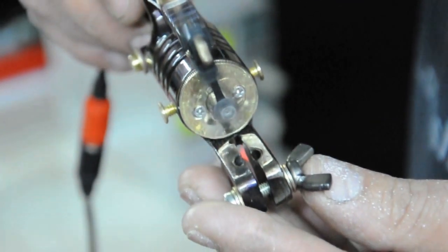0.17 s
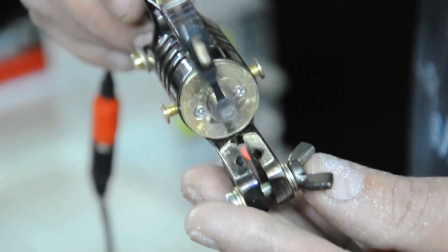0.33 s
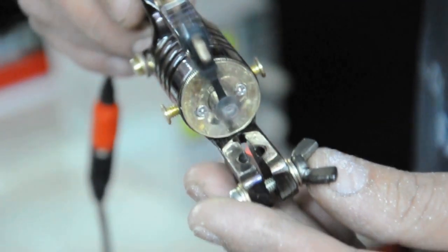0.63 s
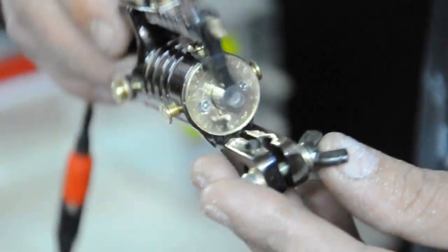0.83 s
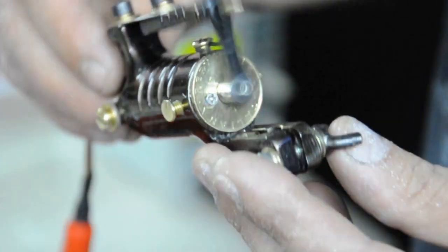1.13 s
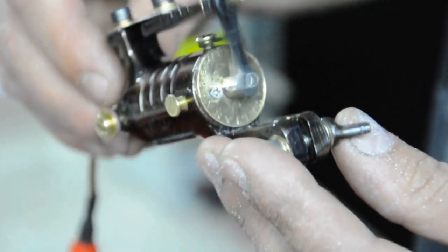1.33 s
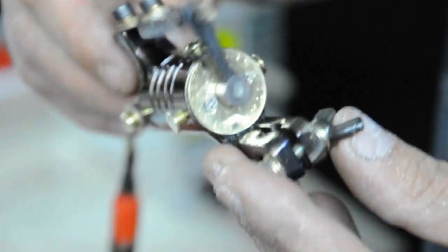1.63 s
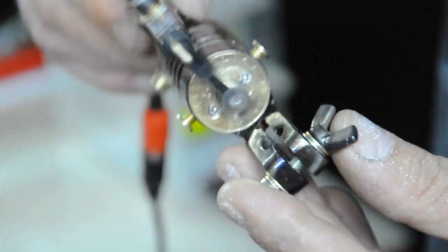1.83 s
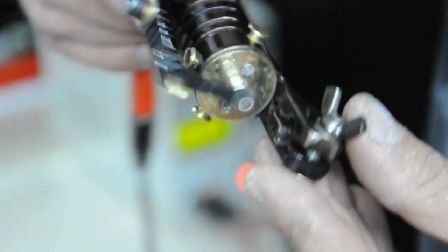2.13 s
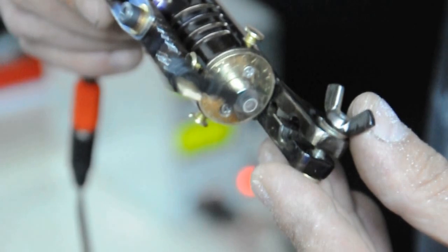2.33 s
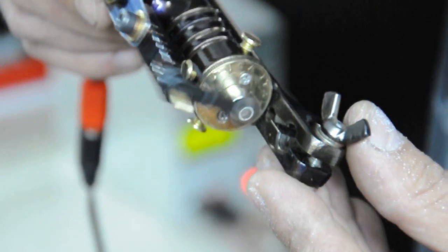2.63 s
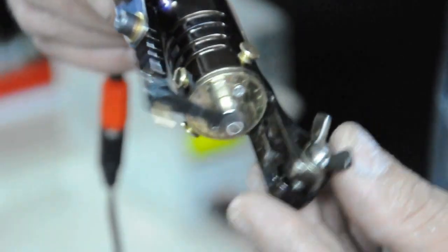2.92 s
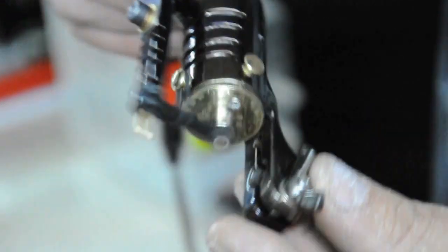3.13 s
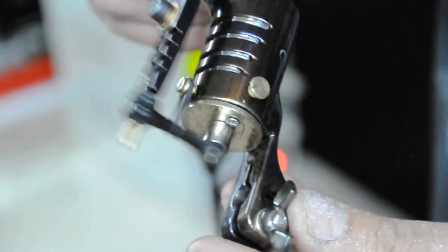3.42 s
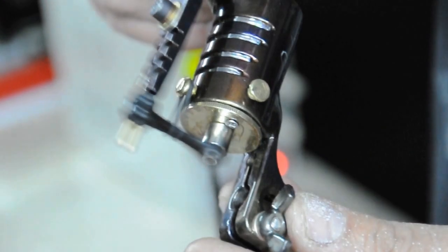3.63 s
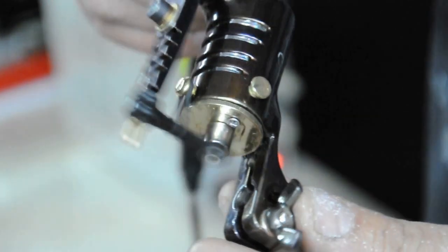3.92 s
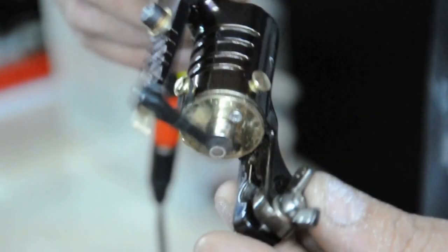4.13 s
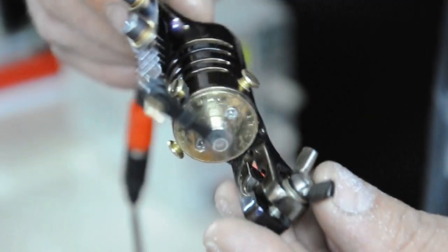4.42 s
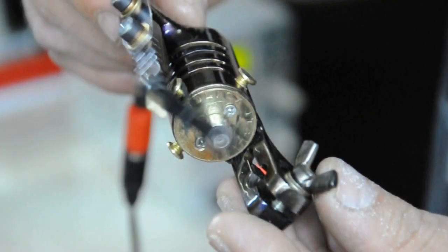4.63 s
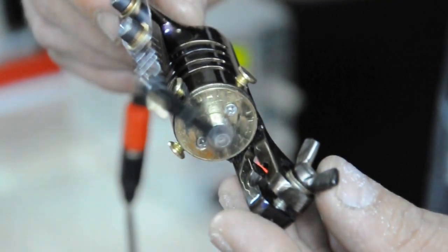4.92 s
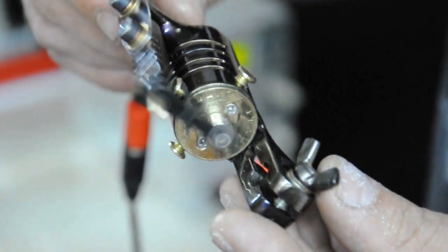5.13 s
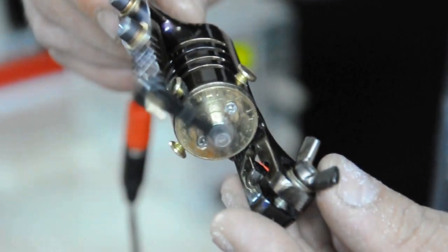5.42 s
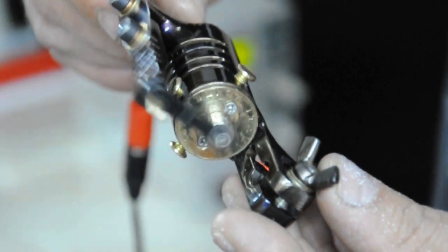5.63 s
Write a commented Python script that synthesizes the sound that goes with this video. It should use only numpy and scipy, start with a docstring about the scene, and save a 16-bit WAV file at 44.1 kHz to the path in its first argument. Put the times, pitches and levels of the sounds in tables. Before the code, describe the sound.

A small electric tattoo machine is already running close to the microphone and keeps going for the whole six seconds or so. Its needle bar knocks so fast that it makes a continuous, thin metallic buzz, mixed with a dry hiss of friction and a slight flutter about seven times a second. The speed is almost constant. From about 0.8 to 2 seconds, as the machine is turned, the pitch sags very slightly and high ringing tones briefly stand out. From around 2 seconds a faint, quick pinging from a loose part pulses within the buzz. Between 3 and 4 seconds the pinging is a little clearer and the highest hiss is slightly duller. From about 4.3 seconds the buzz brightens again and holds steady to the end. Throughout, room ventilation adds a soft, low rush and wavering hum in the background.

```python
"""Tattoo machine, turned in the hands

A rotary tattoo machine runs close to one microphone while it is turned over in the hands. Its crank
knocks the needle bar at both ends of each stroke and rings the metal parts, each beaming its own way;
the bearings and the sliding bar hiss in step. Farther back, the room's ventilation drones."""
import sys
import numpy as np
from scipy import signal
from scipy.fft import rfft, irfft
from scipy.io import wavfile

SR = 44100
rng = np.random.default_rng(int(sys.argv[2]) if len(sys.argv) > 2 else 0)


def to_wav(sig):
    """Store sig (one row per channel, or 1-D mono) as 16-bit WAV at the path in sys.argv[1].

    Samples outside -1..1 are clipped; the rate is SR.
    """
    pcm = np.clip(np.atleast_2d(sig), -1, 1) * 32767
    pcm = np.round(pcm).astype(np.int16)
    wavfile.write(sys.argv[1], SR, pcm.T)  # frames by channels


N = 254060
T = np.arange(N) / SR
SURGE_HZ, SURGE_PEAK_S, TURNS_PER_SURGE = 7.267, .078, 20

# How far the machine is swung from facing the microphone. Each row: time in seconds, angle in degrees.
SWING = [(0, 5), (.72, 6), (.85, -12), (.97, -15.5), (1.15, -21), (1.27, -60), (1.48, -56), (1.67, -31),
         (1.84, -29), (2, -3), (2.25, 15.5), (2.85, 19), (3.15, 56), (3.6, 61), (4, 53), (4.25, 36),
         (5.76, 31)]


def amp(db):
    """Decibels to gain."""
    return 10 ** (np.asarray(db) / 20)


def unit(x):
    """Scales to rms 1."""
    return x / np.sqrt(np.mean(x ** 2) + 1e-20)


def curve(rows):
    """Joins (seconds, value) rows by straight lines."""
    return np.interp(T, *np.transpose(rows))


def bumps(rows):
    """Sum of bell-shaped swells. Each row: centre in seconds, half length in seconds, height."""
    return sum(height * np.exp(-((T - centre) / length) ** 2) for centre, length, height in rows)


def colour(x, points):
    """Filters x by a spectrum of (Hz, dB) points and scales it to rms 1."""
    hz, db = np.transpose(points)
    gain = amp(np.interp(np.log(np.fft.rfftfreq(N, 1 / SR) + 1), np.log(hz), db))
    return unit(irfft(rfft(x) * gain, N))


def drift(rate):
    """A random wander of rms 1, with `rate` changes a second."""
    knots = rng.standard_normal(8192)
    return unit(np.interp(T * rate, np.arange(len(knots)), knots))


def resonate(x, hz, width_hz):
    """A resonance of gain 1 that follows the curve hz."""
    carrier = np.exp(2j * np.pi * np.cumsum(hz) / SR)
    pole = np.exp(-np.pi * width_hz / SR)
    envelope = signal.lfilter([(1 - pole) ** 2], [1, -2 * pole, pole * pole], x / carrier)
    return 2 * (carrier * envelope).real


def lobe(angle, facing, spread=14.7):
    """How far, 0-1, the microphone lies within a beam pointing at `facing`; all angles in degrees."""
    return np.exp(-((angle - facing) / spread) ** 2)


def from_moment(turns, moment):
    """Signed distance, in turns, to the nearest pass of the crank through `moment`."""
    return (turns - moment + .5) % 1 - .5


def ventilation(rush_db=-40.5, flicker_db=1.5, swell_waver_hz=4.9):
    """Behind the machine, a low rush of air with wavering hum tones and brief swells of its rumble."""
    # Spectrum of the moving air. Each row: frequency in Hz, relative level in dB.
    rush_spectrum = [(20, -30), (31, -23), (40, -10.5), (48, -12.5), (75, -19.5), (105, -13.5), (140, -9),
                     (175, -5), (215, -9), (260, -4), (300, -3.5), (345, -5), (385, -2.5), (470, -7),
                     (680, -13), (920, -10.5), (1400, -21), (4000, -67.5)]
    # Steady tones in the drone. Each row: pitch in Hz, level in dB, waver in Hz.
    hum_tones = [(56.8, -57, 0.52), (84.8, -63.5, 0.51), (114.9, -61, 0.76), (175, -52, 0.68),
                 (199.8, -54, 0.88), (243.4, -52.5, 0.4), (264.3, -51.5, 0.39), (302.7, -55.5, 0.94),
                 (368.4, -56.5, 3.04), (417.7, -52.5, 3.2)]
    # Brief random swells of the air's rumble, mostly near 380 Hz.
    # Each row: centre in seconds, half length in seconds, pitch in Hz, level in dB.
    rumble_swells = [(0.176, 0.032, 378, -45.5), (0.333, 0.033, 371, -44), (0.786, 0.036, 400, -40),
                     (.85, 0.042, 392, -41), (.94, 0.016, 377.5, -42), (1.075, 0.058, 382, -43),
                     (1.116, 0.026, 172, -40.5), (1.263, 0.067, 376.7, -42), (1.36, 0.028, 368, -38),
                     (1.47, .025, 385, -42.5), (2.073, 0.07, 275, -43.5), (2.166, 0.046, 380, -41),
                     (2.297, 0.061, 380, -45), (2.408, .02, 185, -42.5), (2.783, .035, 386, -41.5),
                     (2.96, .04, 369, -41.5), (3.12, 0.0083, 370.7, -34), (3.247, 0.014, 393.6, -38),
                     (3.346, 0.035, 396, -40.5), (3.76, 0.059, 368, -44.5), (3.984, 0.044, 379, -43.5),
                     (4.177, .04, 381, -41.5), (4.378, 0.031, 392, -40), (4.47, 0.012, 395, -40.5),
                     (4.648, 0.045, 375, -39.5), (4.768, 0.021, 259.4, -41), (4.985, 0.023, 381.5, -40.5),
                     (5.08, .035, 402, -42.5), (5.186, 0.016, 403.4, -41.5), (5.374, 0.034, 395.4, -38.5),
                     (5.499, 0.061, 370, -40), (5.59, .025, 403, -39.5)]
    drone = amp(rush_db) * colour(rng.standard_normal(N), rush_spectrum)
    for hz, db, waver_hz in hum_tones:
        cycles = np.cumsum(hz + waver_hz * drift(8)) / SR + rng.random()
        drone += np.sqrt(2) * amp(db + flicker_db * drift(5)) * np.sin(2 * np.pi * cycles)
    waver = np.cumsum(swell_waver_hz * drift(40)) / SR
    for centre, length, hz, db in rumble_swells:
        swell = bumps([(centre, length, amp(db))])
        drone += np.sqrt(2) * swell * np.sin(2 * np.pi * (hz * T + waver + rng.random()))
    return drone


def surging(moment=0):
    """The beat of the motor's surges, -1 to 1, peaking at `moment` (0-1) of each surge."""
    return np.cos(2 * np.pi * (SURGE_HZ * (T - SURGE_PEAK_S) - moment))


def crank(surge_depth_hz=1.0, sharpness=3.1, wander_hz=.059):
    """Turns made so far: the motor slows, snags, surges slightly seven times a second and wanders."""
    # Tipping the machine loads the bar and slows the crank. Each row: time in seconds, speed in Hz.
    speed = [(0, 145.5), (.68, 145.25), (.95, 144.2), (1.12, 143.9), (1.28, 142.6), (1.6, 143), (2.02, 145),
             (2.5, 145.35), (3.15, 144.7), (3.85, 144.95), (4.3, 145.5), (5.76, 145.6)]
    # Brief snags of the bar. Each row: centre in seconds, half length in seconds, speed lost in Hz.
    snags = [(.98, 0.03946, 0.774), (3.46, 0.056, .4), (4.0, .03, 1)]
    surge = np.exp(sharpness * (surging() - 1))
    hz = curve(speed) - bumps(snags) + surge_depth_hz * (surge - surge.mean()) + wander_hz * drift(40)
    return np.cumsum(hz) / SR


def knocks(turns, moment, slop_turns=.0011, contact_turns=.003, uneven_db=1.0):
    """One sharp knock a turn; play varies its timing and force, roughly repeating with every surge."""
    turn = np.round(turns - moment).astype(int) + 1
    pattern = rng.standard_normal((TURNS_PER_SURGE, 2))
    play = pattern[np.arange(1024) % TURNS_PER_SURGE] + .22 * rng.standard_normal((1024, 2))
    late, force = slop_turns * play[:, 0], amp(uneven_db * play[:, 1])
    offset = from_moment(turns, moment + late[turn])
    blow = np.exp(-.5 * np.minimum(abs(offset / contact_turns), 10) ** 2)
    return force[turn] * blow / (2 * contact_turns * np.sqrt(np.pi))


def sliding_hiss(turns, level_db=-43, side_on_db=-1, grit_db=1.5, worn_share=.3, grain_points=6080):
    """Friction of the bearings and the needle bar, flaring after each reversal of the bar."""
    # Spectrum of the friction. Each row: frequency in Hz, relative level in dB.
    hiss_spectrum = [(500, -26), (900, -8), (1300, -2.5), (1650, 0.5), (1900, 2), (2200, -2.5), (2800, 0.5),
                     (3300, -3), (3900, 0), (4600, 1.3), (5100, 0.5), (5500, -5), (6200, -10),
                     (6700, -25.5), (7200, -59.5)]
    # Where the parts scrape hardest. Each row: moment in the turn (0-1), width in turns,
    # added pressure in dB relative to the steady pressure.
    scrapes = [(0.052, 0.021, 5), (0.551, 0.048, 4)]
    pressure = 1 + sum(amp(db) * np.exp(-.5 * (from_moment(turns, moment) / width) ** 2)
                       for moment, width, db in scrapes)
    # Worn surfaces give part of the noise the same grain in every surge.
    position = turns / TURNS_PER_SURGE % 1 * grain_points
    grain = unit(np.interp(position, np.arange(grain_points), rng.standard_normal(grain_points)))
    friction = np.sqrt(worn_share) * grain + np.sqrt(1 - worn_share) * rng.standard_normal(N)
    hiss = colour(friction * pressure * amp(grit_db * drift(700)), hiss_spectrum)
    # The frame shades the hiss when side-on, and from one side also hides its treble.
    angle = curve(SWING)
    side_on = 1 - np.cos(np.radians(angle + 10))  # the bar faces the microphone at -10 degrees
    treble = signal.sosfiltfilt(signal.butter(6, 4900, "high", fs=SR, output="sos"), hiss)
    shade = amp(-4 * lobe(angle, facing=64, spread=22))
    return amp(level_db + side_on_db * side_on) * (hiss - treble + shade * treble)


def pings(turns, moment=.16, seated_hz=2593, drop_hz=190, drop_s=.013,
          attack_s=.014, hold_s=.039, release_s=.012, uneven_db=1.2):
    """Once a surge a loose part chatters for a few strokes; its ring drops in pitch as it seats again."""
    # Strength of the pings. Each row: time in seconds, gain in dB.
    strength = [(0, -61.5), (1.8, -50), (2.1, -49.5), (3.2, -46.5), (4, -47.5), (4.3, -49), (5.76, -49)]
    age_s = (SURGE_HZ * (T - SURGE_PEAK_S) - moment) % 1 / SURGE_HZ
    pitch = seated_hz + drop_hz * np.exp(-age_s / drop_s)
    ring = resonate(knocks(turns, 0), pitch, width_hz=120)
    burst = np.minimum(age_s / attack_s, 1) * np.exp(-np.maximum(age_s - hold_s, 0) / release_s)
    return ring * burst * amp(curve(strength) - uneven_db * drift(6))


def grip_shifts(pitches, edge_s=.018):
    """Extra dB over time for each metal mode: as the grip shifts, one part sings out or is damped."""
    # Each row: start and end in seconds, pitch in Hz (the nearest mode responds), gain in dB.
    spells = [(.79, .88, 2586, 5.5), (.81, 0.938, 2024, 2), (.95, 1.04, 2586, 9.5), (.95, 1.17, 4786, 7),
              (.97, 1.02, 2024, -6), (.97, 1.06, 2907, 7), (1.05, 1.154, 2024, 2.5), (1.06, 1.22, 2586, 5),
              (1.23, 1.28, 2586, -11), (1.54, 1.64, 4314, 6), (1.56, 1.737, 2586, 7.5),
              (1.62, 1.74, 2907, 8), (1.76, 1.836, 2024, 3.5), (1.77, 1.853, 2586, 6),
              (1.87, 1.97, 4786, 2), (1.9, 1.98, 2024, 0), (1.97, 2.117, 5234, 5.5),
              (3.15, 3.24, 2024, 0.5), (3.97, 4.074, 2024, 2.5)]
    extra_db = np.zeros((len(pitches), N))
    for start, end, hz, db in spells:
        gate = np.clip(.5 + np.minimum(T - start, end - T) / edge_s, 0, 1)
        extra_db[np.argmin(abs(pitches - hz))] += db * gate
    return extra_db


def ringing_metal(turns):
    """Close up, knocked parts ring, swelling or fading as their lobes and shadows pass the microphone."""
    # Modes of the metal parts. Each row: pitch in Hz, width in Hz, gain in dB, stroke that knocks it
    # (0 down, .5 up), angle in degrees and gain in dB of a first lobe or shadow, the same for a second,
    # depth in dB of its pulsing with the surges, moment of that pulse in each surge (0-1).
    modes = [ (1164, 100, -63.5, 0, 1.5, 4.5, 34.5, 8.5, 2.5, 0.5),
             (1313, 62, -54.5, 0, -40, -15.5, -7.5, -6.5, 1, 0.2),
             (1453.5, 120, -53, 0, -38.5, -4.5, -8, -2, 0.5, .9),
             (1602, 55, -50, 0, -24.5, -11, 34.5, 2, 1.5, .69),
             (1760, 66, -56, 0, 33.5, 9, 60.5, 9, 1.5, .5),
             (1880.4, 100, -48, 0, -25.5, -4.5, 17.5, -1.8, 1.5, 0.82),
             (2021, 62, -51, 0, -55, -11, -17, 2.5, 2.5, .45),
             (2314, 150, -57.5, .5, -51, -15, 32, -1, 4.5, 0.1),
             (2476, 67, -69, 0, 17.5, -0.5, 59, 7, 1.5, 0), (2592, 90, -62, 0, -55, 10.5, -24, 9, 1, .8),
             (2728, 130, -57, 0, 0.5, 0.5, 24, -4, 5, 0), (2902, 100, -58, .5, -31, 3, 51, 7, 2, .45),
             (3016, 84, -56.5, .5, -45, -5, 57, 3, 4.5, 0.05),
             (3186, 67, -61.5, 0, -40.5, 13.5, 16, 4, 6.5, 0.42),
             (3300, 170, -57, 0, -12.5, 2, 59, -6, 0.5, 1),
             (3448, 120, -51.5, .5, -29, -3.5, 45.5, -5, 2, 0.5),
             (3600, 96, -60, 0, -16, -2.5, 48, 2.5, 1, 0.3),
             (3760, 140, -56.5, 0, 31.5, 5.5, 66, 4, 4.5, 0.91),
             (3870, 150, -53.5, 0, 16, -12, 46.5, -8.5, -1.5, 1),
             (4000, 110, -64, 0, 29.5, 4, 55.5, 6.5, 0.5, 0.5),
             (4136, 92, -68, .5, 14.5, 8, 56, -3, 4, 0.6), (4297, 270, -60, .5, -15, -5, 9.5, -5, 5.5, .85),
             (4542, 240, -51.5, 0, 1, -2, 53, -13.5, 2, 0.8), (4613, 68, -52, .5, 26, 4.5, 40, -1, 3.5, 1),
             (4790, 130, -52, 0, -57, -9.5, 67.5, -10, 2.5, 0.65),
             (4925, 88, -50, .5, 18.5, -4.5, 60.5, -14.5, 0, 0.9),
             (5190, 79, -61.5, 0, 17.5, 6.5, 33.5, -3.5, 5, .7),
             (5500, 62, -67.5, 0, -36, -4.5, 15, 8, 6.5, 0), (6100, 46, -71, 0, 2.5, 12, 34, 9.5, 0, 0.3),
             (6370, 120, -74, .5, 15, 5.5, 33, 5, 2, 0.9)]
    pitches = np.array([mode[0] for mode in modes])
    angle, metal = curve(SWING), np.zeros(N)
    strokes = {0: knocks(turns, 0), .5: knocks(turns, .5)}
    for mode, grip_db in zip(modes, grip_shifts(pitches)):
        hz, width, db, stroke, first, first_db, second, second_db, pulse_db, pulse_moment = mode
        b, a = signal.iirpeak(hz, hz / width, fs=SR)
        ring = signal.lfilter(b, a, signal.lfilter(b, a, strokes[stroke]))
        beam_db = first_db * lobe(angle, first) + second_db * lobe(angle, second)
        metal += ring * amp(db + beam_db + grip_db + pulse_db * surging(pulse_moment))
    return metal


def scene():
    """The close machine and the room behind it reach one microphone, alike in both channels."""
    turns = crank()
    mono = ringing_metal(turns) + pings(turns) + sliding_hiss(turns) + ventilation()
    return np.array([mono, mono])


def record(dry):
    """The recorder's narrow band ends steeply at 7080 Hz."""
    lowpass = signal.firwin(511, 7080, window=("kaiser", 9), fs=SR)
    return signal.oaconvolve(dry, lowpass[None], "same")


dry = scene()
out = record(dry)
to_wav(out)
```